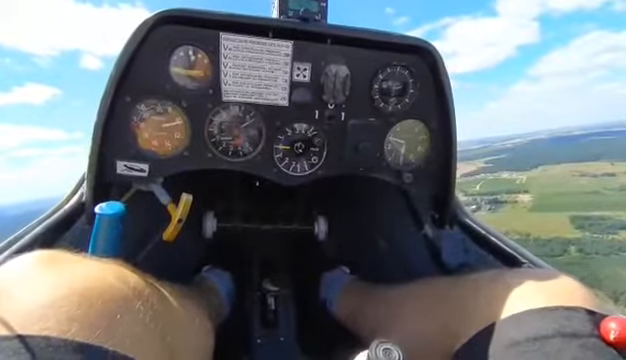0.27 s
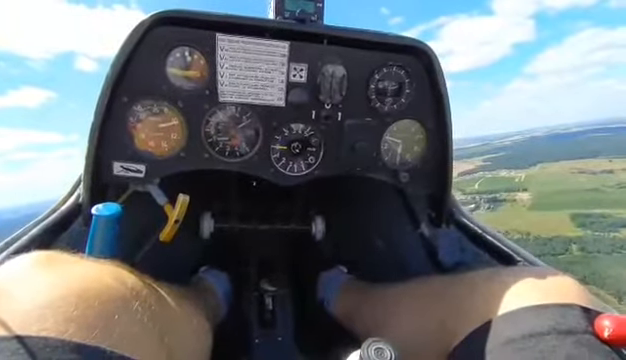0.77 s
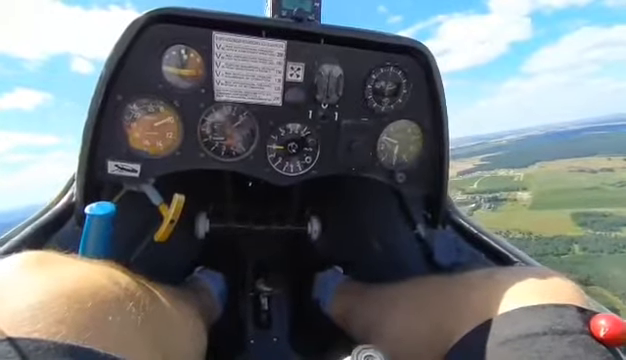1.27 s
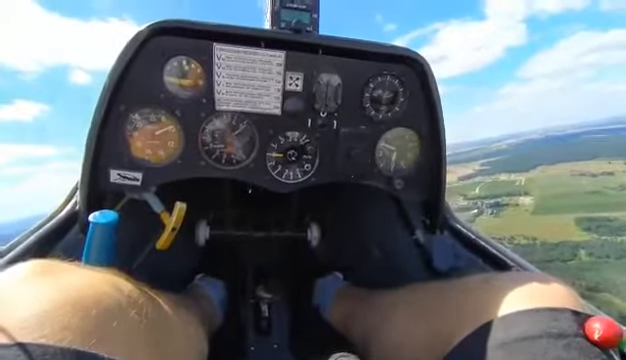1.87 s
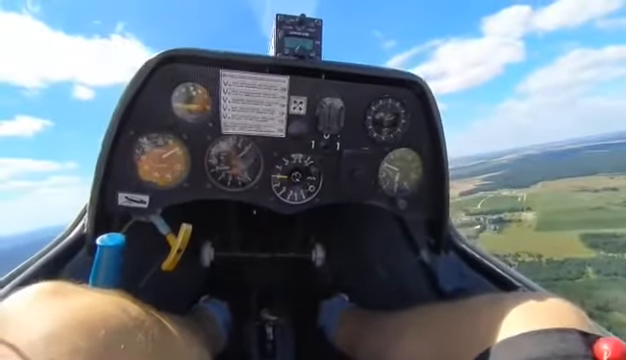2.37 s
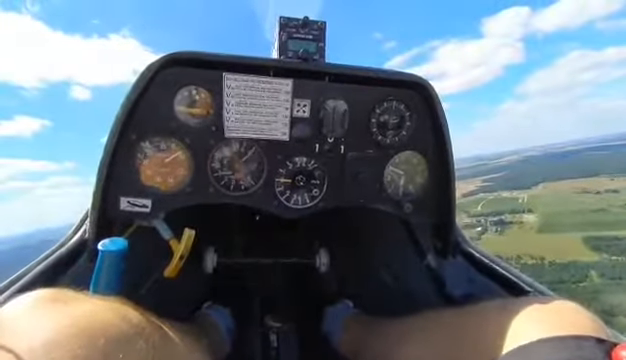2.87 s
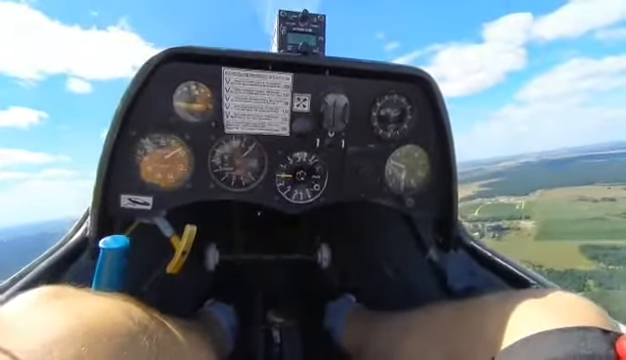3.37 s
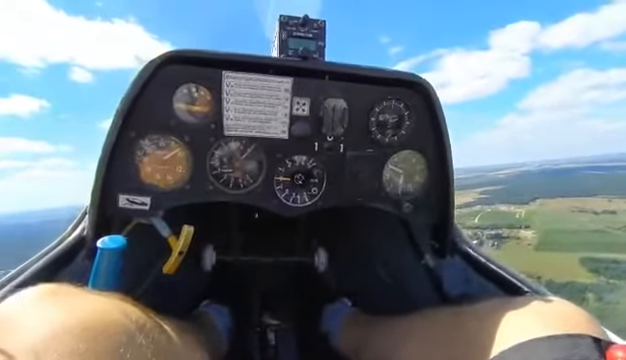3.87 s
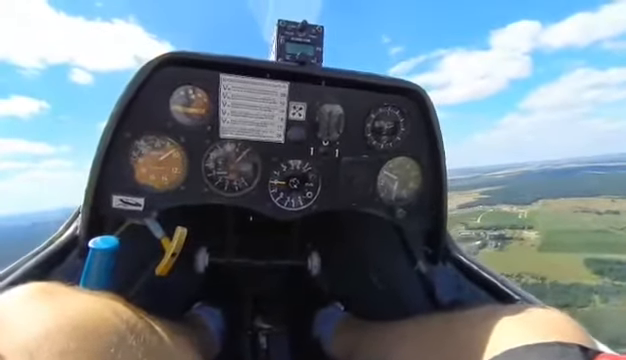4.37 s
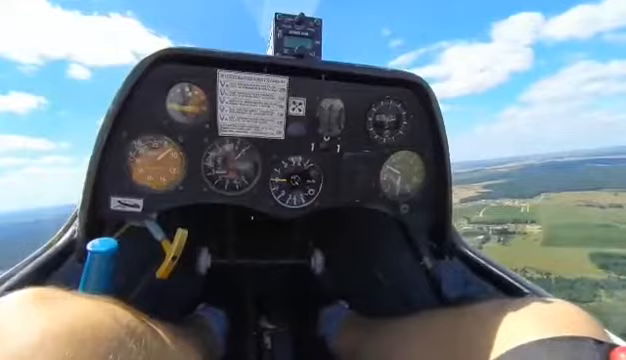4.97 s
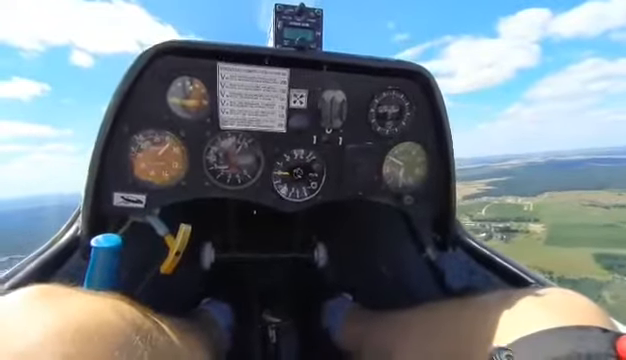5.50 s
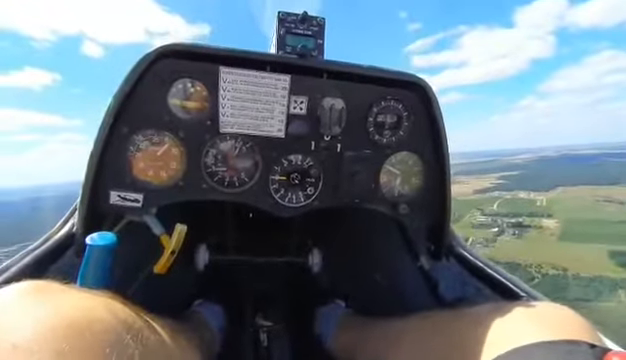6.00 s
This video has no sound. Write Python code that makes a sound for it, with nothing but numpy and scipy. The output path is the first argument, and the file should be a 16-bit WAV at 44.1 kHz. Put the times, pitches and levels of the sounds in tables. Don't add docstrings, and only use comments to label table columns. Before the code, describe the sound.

Constant airflow roars around a small engineless aircraft cabin, with irregular soft low thuds of buffeting and a fuzzy, wavering whistle from a gap.

```python
import sys
import numpy as np
from scipy import signal
from scipy.fft import rfft, irfft, next_fast_len
from scipy.io import wavfile
from scipy.ndimage import uniform_filter1d

SR = 44100
rng = np.random.default_rng(int(sys.argv[2]) if len(sys.argv) > 2 else 0)


def rack_gain(trim_db):
    fader = np.asarray(trim_db, float)
    return 10 ** (fader / 20)


def unload_wav(signal):
    wavfile.write(
        sys.argv[1],
        SR,
        np.round(np.clip(np.atleast_2d(signal).T, -1, 1) * 32767).astype(np.int16),
    )


N = 275165

FRAME, HOP = 1024, 256
FRAME_S = np.arange(N // HOP + 5) * HOP / SR
BIN_HZ = np.fft.rfftfreq(FRAME, 1 / SR)


def boom():
    # [f/Hz, width/Hz, left/dB, right/dB, right lead/rad]
    hollow_modes = [(48, 34, -15, -20.5, 0.1), (96, 26, -16.5, -23.5, 0.1), (154.3, 23, 0, -6, 0.12),
                    (184.6, 37.9, -2, -10, 0.21), (256.4, 85, -8, -20.5, 0.58),
                    (331.3, 74, -12.5, -29, 1.4), (416, 46, -28, -38.5, 4.2), (588, 88, -31, -25.5, 0.43),
                    (832, 66, -23.5, -24, 0.28), (926, 55, -20, -24, 0.34), (996.4, 45, -18.5, -19, 0.25)]
    # [t/s, boom/dB]
    buffets = [(.035, -24), (.18, -15.5), (.71, -22), (.86, -21.5), (1.15, -16.5), (1.3, -16.5),
               (1.45, -16.5), (1.6, -16.5), (1.74, -19), (1.98, -24), (2.11, -18), (2.24, -16),
               (2.46, -20.5), (2.69, -18), (3.08, -18.5), (3.58, -19.5), (3.8, -21), (3.97, -22),
               (4.07, -19.5), (4.33, -17.5), (4.47, -19), (4.8, -22.5), (4.92, -20), (5.08, -22.5),
               (5.22, -23), (5.5, -18), (5.75, -18), (5.95, -17.5), (6.14, -17), (6.22, -20)]
    gust_s, gust_db = np.transpose(buffets)
    calm_power = rack_gain(2 * (rush_db(share=0.37) + 12))
    power = calm_power + swells(gust_s, rack_gain(2 * gust_db), half_s=0.03)

    drive = rng.standard_normal(N)
    deep = evened(through_modes(drive, hollow_modes[:2])) * rack_gain(-34.5)
    low = steadied(through_modes(drive, hollow_modes[2:4]), span_s=0.06) * np.sqrt(power)
    upper = evened(through_modes(drive, hollow_modes[4:])) * rack_gain(rush_db(share=0.37) + 7.5)
    return deep + low + upper


def whistle():
    # [f/Hz, width/Hz, left/dB, right/dB, right lead/rad]
    ringing_modes = [(1410, 45, -6, -14, -1.5), (1475, 30, -8, -6, 1.3), (1541, 31, -1, -8, -1.9),
                     (1600, 22, -4.5, -2.5, -.7), (1659, 29, -2, 4, -2.5), (1755, 22, -.5, 1, 2.2),
                     (1779, 50, .5, -2, -.1), (1825, 34, 0, -1, .9), (1860, 41, -9, -10, -.1)]
    # [t/s, centre f/Hz, level between flares/dB]
    band_drift = [(0, 1740, -39), (.7, 1790, -36), (1, 1800, -27), (1.4, 1770, -33), (2, 1800, -30),
                  (2.3, 1760, -24.5), (2.9, 1680, -25), (3.4, 1714, -28.5), (3.9, 1770, -26),
                  (4.3, 1630, -25.5), (4.75, 1560, -36.5), (5, 1420, -47), (5.5, 1620, -54),
                  (5.9, 1630, -40), (6.15, 1670, -31), (6.24, 1660, -28.5)]
    # [t/s, lift/dB]
    flares = [(.47, 13.5), (.97, 8), (1.34, 5.5), (1.58, 8), (1.72, 5.5), (1.92, 9), (2.119, 12.5),
              (2.2, 6.5), (2.41, 5.5), (2.77, 5.5), (3.06, 5), (3.32, 10), (3.47, 1), (3.71, 5.5),
              (3.92, 5.5), (4.12, 9.5), (4.55, 4.5), (4.78, 11), (5.71, 17), (5.96, 11.5), (6.08, 7),
              (6.2, 13.5)]
    drift_s, centre_hz, band_db = np.transpose(band_drift)
    flare_s, lift_db = np.transpose(flares)

    half_width = 0.057
    off = (BIN_HZ[:, None] / np.interp(FRAME_S, drift_s, centre_hz) - 1) / half_width
    drive = frames_noise(-4.3 * np.minimum(off ** 2, 14.0))
    gain = rack_gain(along(drift_s, band_db) + swells(flare_s, lift_db, half_s=0.02))
    return steadied(through_modes(drive, ringing_modes), span_s=0.07) * gain


def rush():
    # [f/Hz, density/dB per Hz]
    skin_spectrum = [(50, -26), (200, -3.5), (350, 5), (600, -7), (1200, -4.5), (2150, -5.5), (2700, -11.5),
                     (4000, -12), (6300, -14.5), (7200, -12), (9700, -17.5), (10800, -13.5), (11600, -18),
                     (13200, -26)]
    # [f/Hz, gain/dB]
    right_tilt = [(100, 4), (330, -3), (500, -5), (1100, -2.5), (2150, 4), (2700, 0), (6800, -1.5),
                  (8500, 4), (10000, 6.5), (11000, -3.5)]
    patches = rng.standard_normal((len(FRAME_S), len(BIN_HZ))).T
    patches = uniform_filter1d(patches, 40, axis=0)
    patches = evened(uniform_filter1d(patches, 9, axis=1))
    gusts = evened(uniform_filter1d(rng.standard_normal(len(FRAME_S)), 8))
    field_db = read(skin_spectrum, BIN_HZ)[:, None] + 1.2 * patches + 0.35 * gusts
    left, right, shared = frames_noise(np.array([field_db] * 3))

    tail_n, decay_s = 3000, 0.05
    decay = rack_gain(-60 * np.arange(tail_n) / SR / decay_s)
    echoes = rng.standard_normal((2, tail_n)) * decay / np.linalg.norm(decay)
    bounced = signal.fftconvolve(shared[None], echoes, axes=1)[:, :N]
    left, right = np.array([left, right]) + rack_gain(-3.5) * bounced

    tilt = rack_gain(read(right_tilt, np.fft.rfftfreq(N, 1 / SR)))
    right = irfft(rfft(right) * tilt, N)
    return evened(np.array([left, right])) * rack_gain(rush_db(share=0.74) + 9.0)


def rush_db(share):
    # [t/s, level/dB]
    airspeed = [
        (0, -31),
        (1.0, -33),
        (1.5, -34),
        (4.1, -34.5),
        (4.4, -35.5),
        (4.8, -35.5),
        (5.2, -38),
        (6.24, -37.5),
    ]
    flow_db = along(*np.transpose(airspeed))
    return flow_db.mean() + share * (flow_db - flow_db.mean())


def through_modes(drive, modes):
    size = next_fast_len(N)
    hz = np.fft.rfftfreq(size, 1 / SR)
    response = np.zeros((2, len(hz)), complex)
    for k, (mode_hz, width_hz, left_db, right_db, lead_rad) in enumerate(modes):
        peak = (-1) ** k / (1 + 2j * (hz - mode_hz) / width_hz)
        right_gain = rack_gain(right_db) * np.exp(1j * lead_rad)
        response += peak * np.array([[rack_gain(left_db)], [right_gain]])
    return irfft(rfft(drive, size) * response, size)[:, :N]


def frames_noise(gain_db):
    z = rng.standard_normal(gain_db.shape) + 1j * rng.standard_normal(gain_db.shape)
    return signal.istft(z * rack_gain(gain_db), nperseg=FRAME, noverlap=FRAME - HOP)[1][..., :N]


def steadied(x, span_s):
    size = int(span_s * SR)
    power = uniform_filter1d((x ** 2).mean(0), size)
    power = uniform_filter1d(power, size)
    return x / np.sqrt(abs(power) + 1e-12)


def swells(times_s, heights, half_s):
    t = np.arange(0, N + 64, 64) / SR
    bells = np.exp(-((t - times_s[:, None]) / half_s) ** 2)
    return np.interp(np.arange(N) / SR, t, heights @ bells)


def along(s, values, smooth_s=0.025):
    return uniform_filter1d(np.interp(np.arange(N) / SR, s, values), int(smooth_s * SR))


def read(points, hz):
    f, value = np.transpose(points)
    return np.interp(np.log(hz + 1), np.log(f + 1), value)


def evened(x):
    return x / np.sqrt(np.mean(x ** 2) + 1e-20)


def thinned(x):
    # [f/Hz, threshold/spreads of chance]
    thrift = [(2300, -2.8), (2900, -1.3), (3500, -.8), (4300, -1.2), (5000, -.6), (5500, -1.1), (6100, -.5),
              (6700, -.8), (7100, -1.7), (10500, -1.5), (11000, -.6), (11400, .3), (12100, 1), (13000, 1.9)]
    mid_side = np.array([x[0] + x[1], x[0] - x[1]]) / 2
    hz, _, z = signal.stft(mid_side, SR, nperseg=FRAME, noverlap=FRAME - HOP)
    _, bins, frames = z.shape

    blocks = (2, bins // 5 + 1, frames // 5 + 1)
    chance = evened(uniform_filter1d(rng.standard_normal(blocks), size=2, axis=2))
    starved = rng.standard_normal(blocks[2])
    kept = evened(chance + 0.4 * starved) > read(thrift, hz[::5])[:, None]
    kept = kept.repeat(5, axis=1).repeat(5, axis=2)[:, :bins, :frames]

    dip_share, dip_db, dip_from_hz = 0.03, -9, 2600
    dips = rng.random((bins // 60 + 1, frames // 3 + 1)) < dip_share
    dips = dips.repeat(60, axis=0).repeat(3, axis=1)[:bins, :frames]
    dips = dips * (hz[:, None] > dip_from_hz)

    z = z * kept * rack_gain(dip_db * dips)
    mid, side = signal.istft(z, SR, nperseg=FRAME, noverlap=FRAME - HOP)[1][:, :N]
    return np.array([mid + side, mid - side])


def scene():
    return boom() + whistle() + rush()


def top_cut(x):
    return signal.sosfilt(signal.butter(12, 13120, fs=SR, output="sos"), x)


def record(dry):
    mix = thinned(dry)
    return top_cut(mix)


dry = scene()
out = record(dry)
unload_wav(out)
```